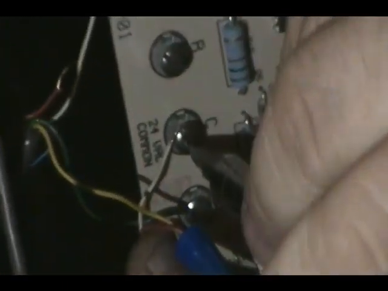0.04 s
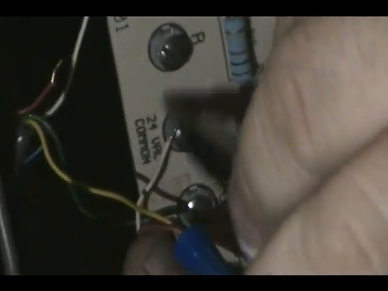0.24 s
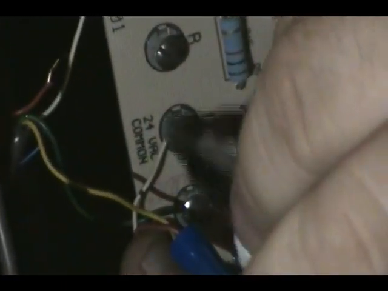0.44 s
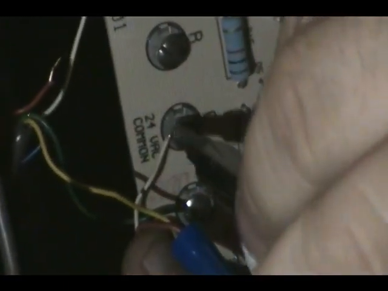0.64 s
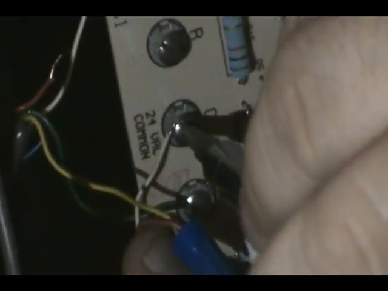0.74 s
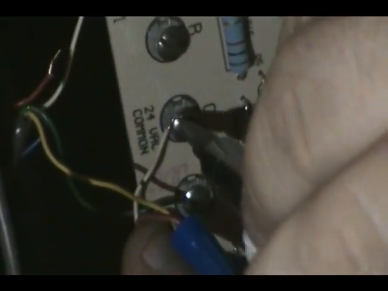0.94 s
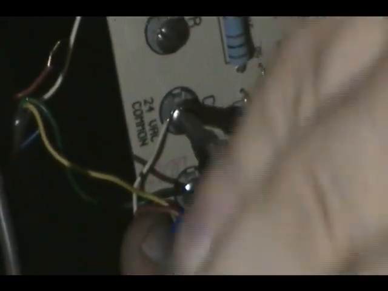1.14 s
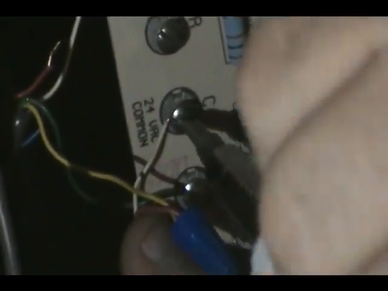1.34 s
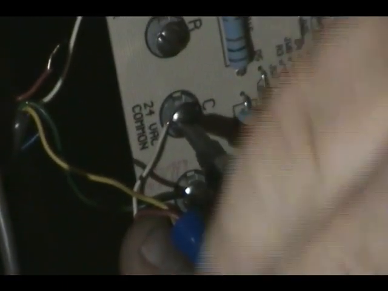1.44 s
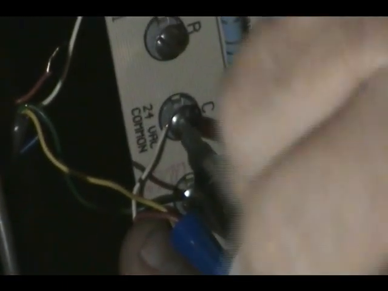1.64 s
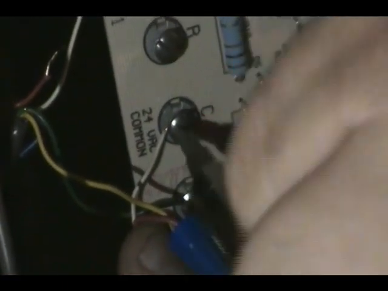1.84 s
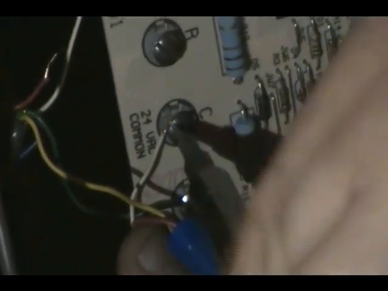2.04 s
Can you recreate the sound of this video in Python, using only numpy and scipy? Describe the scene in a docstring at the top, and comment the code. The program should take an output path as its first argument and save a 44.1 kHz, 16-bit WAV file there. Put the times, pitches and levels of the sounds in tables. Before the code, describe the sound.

A small tool clicks and scrapes lightly on a circuit board's screw terminal, close up.

```python
"""Close up, a small tool works a thin wire onto the screw terminals of a circuit board. The board rings
faintly at the start, and the wire flicks with two dry ticks. Then the tool knocks and scrapes, and each
contact excites the damped modes of board and housing in a small room. Fingers bump the board as they
change grip, and near the end skin brushes softly. A low rumble, hiss, hum and a faint whine lie under
it all."""
import sys
import numpy as np
from scipy import signal
from scipy.fft import rfft, irfft, next_fast_len
from scipy.io import wavfile
from scipy.ndimage import map_coordinates

SR = 44100
rng = np.random.default_rng(int(sys.argv[2]) if len(sys.argv) > 2 else 0)


def wav_record(signal):
    """Record a signal, one row per channel, as 16-bit PCM in the file named by sys.argv[1]."""
    frames = np.transpose(np.atleast_2d(signal))
    bounded = np.clip(frames, -1, 1)
    # unit amplitude maps onto the largest positive 16-bit level
    quanta = np.round(bounded * 32767).astype(np.int16)
    wavfile.write(sys.argv[1], SR, quanta)


N = 92610

# spectrum of the board's dense, quickly damped modes (frequency [Hz], relative density [dB])
CLATTER_SPECTRUM = [(100, -10), (350, -7), (530, 5), (750, -3), (1000, -2), (1270, 4), (1650, 6.5),
                    (2100, 1.5), (2900, 2.5), (3700, 0), (5000, -6.5), (7500, -13), (11000, -16),
                    (15000, -27)]
# left-right coherence of scattered contact sound (frequency [Hz], coherence [1])
CONTACT_COHERENCE = [(50, 0.52), (500, 1), (2500, 0.91), (5000, 0.78), (9000, 0.19), (15000, 0.53)]
# left-right coherence of room noise and skin friction (frequency [Hz], coherence [1])
AIR_COHERENCE = [(50, 0.91), (600, 0.9), (2000, 0.16), (5000, 0.22), (14000, 0.037)]
BASS_HZ, MID_HZ, TREBLE_FROM_HZ, TREBLE_HZ, SIZZLE_HZ = 650, 1250, 1700, 6440, 10100


def amp(db):
    """Amplitude ratio: tenfold for every 20 dB."""
    return 10 ** (np.asarray(db) / 20)


def along(points, hz):
    """Interpolation of (frequency [Hz], value) points on a logarithmic frequency axis."""
    freqs, values = np.transpose(points)
    return np.interp(np.log(hz + 1), np.log(freqs + 1), values)


def unit_energy(x):
    """Normalisation to a mean energy of 1 per channel."""
    return x / np.sqrt(np.mean(np.sum(x ** 2, axis=-1)) + 1e-20)


def filtered(x, response):
    """Linear filtering: the spectrum of x times a frequency response."""
    n = x.shape[-1]
    padded = 2 * next_fast_len(n)
    return irfft(rfft(x, padded) * response(np.fft.rfftfreq(padded, 1 / SR)), padded)[..., :n]


def minimum_phase(db):
    """Causal response with these levels, obtained by folding the cepstrum."""
    cepstrum = irfft(np.log(amp(db)))
    half = len(cepstrum) // 2
    cepstrum[1:half] *= 2
    cepstrum[half + 1:] = 0
    return np.exp(rfft(cepstrum))


def noise(n, spectrum, coherence):
    """Coloured stereo noise of rms 1; the ratio of mid to side sets the coherence."""
    def response(hz):
        angle = np.arccos(np.clip(along(coherence, hz), -.999, .999)) / 2
        return amp(along(spectrum, hz)) * [np.cos(angle), np.sin(angle)]
    mid, side = filtered(rng.standard_normal((2, n)), response)
    return unit_energy(np.array([mid + side, mid - side])) * np.sqrt(n)


def decay(t, t60):
    """Exponential damping: 60 dB in t60 seconds."""
    return np.exp(-np.log(1000) * t / t60)


def pan(db):
    """Left and right gains for an interchannel level difference."""
    return amp(np.array([[.5], [-.5]]) * db)


def add(out, time, db, sound):
    """Superposition; db is the level that a sound of unit energy would have if packed into 10 ms."""
    start = round(time * SR)
    out[:, start:start + sound.shape[1]] += amp(db) * np.sqrt(SR / 100) * sound[:, :N - start]


def tool_contacts():
    """Impact and sliding friction: a hard tool drives the board through the terminal."""
    # spectrum of a hard contact (frequency [Hz], gain [dB])
    hard = [(80, -6), (280, -15), (480, -1), (1400, -0.5), (3000, -5), (8000, 3.5), (15000, -12)]
    # impacts (time [s], level before colouring [dB], bass [dB], treble [dB], sizzle [dB],
    # resonances favoured by the spot struck [(frequency [Hz], lift [dB])])
    knocks = [(0.3698, -29.5, -0.5, -2.5, -22, [(525, 7), (2420, 9.5), (3030, 13.5), (3600, 4)]),
              (0.4121, -31.5, -1, -8, -5, [(2570, 14.5), (3300, 8), (3950, 12)]),
              (0.4127, -34, -10, -26, 3, [(1270, 6.5), (1600, 2.5)]), (0.4768, -33.5, -5, -5, 9, [(1840, 1),
              (2230, 11), (3150, 18.5)]), (0.4890, -34.5, -13.5, -9, 9, [(1290, 5.5), (3130, 19.5)]),
              (0.5266, -35, 2.5, 0, 6, [(1850, 7), (3130, 13.5), (5700, 5)]),
              (0.6461, -36.5, 4.5, 8, -1, [(1660, 12), (2600, 10), (2870, 11)]),
              (0.6475, -40, 7, 1.5, 10, [(1660, 8), (2750, 6), (3120, 12)]),
              (0.7875, -38.5, -14, -9, -2, [(1190, 4), (1486, 6.5)]),
              (1.352, -47, 5.5, -3, -15, [(1300, 4.5), (1540, 6)])]
    # slides (peak time [s], rise [s], fall [s], level before colouring [dB], bass [dB], treble [dB],
    # sizzle [dB], favoured resonance [Hz], lift [dB])
    scrapes = [(.267, .012, 0.051, -32, 3.5, 0, -6.5, 2840, 13),
               (.405, 0.023, 0.035, -41.5, 7, 3.5, -17, 3310, 15.5),
               (0.505, 0.025, 0.029, -38, -7, -4, 4, 2153, 17),
               (.714, 0.025, 0.063, -40.5, 4.5, -6.5, -12, 1580, -2),
               (.772, 0.013, 0.013, -51.5, 4.5, -8, -16, 3800, 2.7),
               (.83, 0.036, 0.01, -46, 9, -6, -3, 1166, 12), (.992, .02, 0.023, -51, 8.5, -8, -6, 550, -11)]
    out = np.zeros((2, N))
    for time, db, bass_db, treble_db, sizzle_db, spots in knocks:
        add(out, time, db, board_response(hard, bass_db, treble_db, sizzle_db, spots))
    for time, rise, fall, db, bass_db, treble_db, sizzle_db, spot_hz, spot_db in scrapes:
        response = board_response(hard, bass_db, treble_db, sizzle_db, [(spot_hz, spot_db)])
        add(out, time - rise, db, friction(response, rise, fall))
    return out


def board_response(contact, bass_db, treble_db, sizzle_db, spots):
    """Impulse response as a sum of damped modes, weighted by the kind and the point of contact."""
    # modes of board and housing (frequency [Hz], level [dB], t60 [s])
    modes = [(270, -17, 0.14), (536.7, -1.5, 0.26), (631, -5.5, 0.11), (699, -13.5, 0.36),
             (721.6, -17, 0.27), (866, -10, 0.36), (1192.7, -1, 0.15), (1254, 13, 0.044), (1570, 3, 0.18),
             (1852, -10, 0.26), (2262, -8.5, 0.35), (2604, 6, 0.04), (3058, 5.5, 0.037)]
    # stereo balance of the board (frequency [Hz], left minus right [dB])
    balance = [(500, 1), (1500, 0), (3000, 1), (8000, 1.5), (15000, 1)]
    ring_db, room_db, mode_spread_db = -3, -5, 2.26
    ring_attack_s, clatter_attack_s = 0.00012, 0.00018
    spot_octaves, ripple_db, ripple_spacing_hz = 0.062, 3, 165.4
    bending_delay_s, bending_hz = 0.00304, 1317
    t = np.arange(SR // 2) / SR
    ring = np.zeros(len(t))
    for mode_hz, db, t60 in modes:
        strength = amp(db + mode_spread_db * rng.normal())
        ring += strength * np.sin(2 * np.pi * (mode_hz * t + rng.random())) * decay(t, t60)
    ring = unit_energy(ring * (1 - np.exp(-t / ring_attack_s)))
    onset = 1 - np.exp(-t / clatter_attack_s)
    clatter = unit_energy(noise(len(t), CLATTER_SPECTRUM, CONTACT_COHERENCE) * onset * decay(t, t60=0.051))
    room = unit_energy(onset * reverberation(len(t)))
    tilt = [(BASS_HZ, bass_db), (MID_HZ, 0), (TREBLE_FROM_HZ, 0),
            (TREBLE_HZ, treble_db), (SIZZLE_HZ, sizzle_db)]
    knots = rng.standard_normal(size=512)

    def colour(hz):
        peaks = sum(lift_db / (1 + (np.log2((hz + 1) / spot_hz) / spot_octaves) ** 2)
                    for spot_hz, lift_db in spots)
        # many small upper resonances ripple the spectrum
        depth = ripple_db * np.minimum(hz / TREBLE_HZ, 1)
        ripple = depth * np.interp(hz / ripple_spacing_hz, np.arange(len(knots)), knots)
        # bending waves are dispersive: the lows arrive after the click
        dispersion = np.exp(-2j * np.pi * bending_delay_s * bending_hz * np.arctan(hz / bending_hz))
        levels = along(contact, hz) + along(tilt, hz) + peaks + ripple
        return minimum_phase(levels) * dispersion * pan(along(balance, hz))
    return filtered(clatter + amp(ring_db) * ring + amp(room_db) * room, colour)


def friction(response, rise, fall, slips_per_s=4500, spread_db=2.5):
    """Stick-slip excitation: random impulses swell by 20 dB over the rise and sink 20 dB per fall."""
    t = np.arange(int((rise + 2 * fall) * SR)) / SR - rise
    slipping = rng.random(SR)[:len(t)] < slips_per_s / SR
    size = amp(spread_db * rng.standard_normal(SR)[:len(t)])
    sign = rng.choice([-1, 1], SR)[:len(t)]
    envelope = 10 ** np.minimum(t / rise, -t / fall)
    slips = slipping * sign * size * envelope
    energy = np.mean(np.sum(response ** 2, axis=1))
    return unit_energy(signal.fftconvolve(response, slips[None], axes=1)) * np.sqrt(energy)


def wire_ticks():
    """Free vibration: a flick excites the wire's heavily damped modes; nearby surfaces scatter it."""
    # flicks of the wire (time [s], level [dB], treble [dB])
    ticks = [(0.2336, -34.5, 1), (0.2728, -38.5, -14)]
    # resonances of the wire (frequency [Hz], bandwidth [Hz], level [dB])
    modes = [(1550, 330, -4), (2830, 240, 6.5), (4620, 320, 0), (6680, 370, -4.5), (8300, 720, -11.5),
             (13000, 3600, -22)]
    scatter_db, tail_db = -3, -7
    out = np.zeros((2, N))
    t = np.arange(SR // 10) / SR

    def resonances(hz):
        return sum((-1) ** k * amp(db) * 1j * hz * width / (mode_hz ** 2 - hz ** 2 + 1j * hz * width)
                   for k, (mode_hz, width, db) in enumerate(modes))
    for time, db, treble_db in ticks:
        white = noise(len(t), [(1000, 0)], CONTACT_COHERENCE)
        scatter = unit_energy(white * decay(t, t60=0.0072))
        impulse = (t == 0) + amp(scatter_db) * scatter
        tilt = [(TREBLE_FROM_HZ, 0), (TREBLE_HZ, treble_db), (2 * TREBLE_HZ, 2 * treble_db)]
        flick = unit_energy(filtered(impulse, lambda hz: resonances(hz) * minimum_phase(along(tilt, hz))))
        tail = unit_energy(noise(len(t), CLATTER_SPECTRUM, CONTACT_COHERENCE) * decay(t, t60=0.045))
        add(out, time, db, pan(db=4) * (flick + amp(tail_db) * tail))
    return out


def ring_and_bumps():
    """Low-mode resonance: the board rings faintly at the start; later, fingers bump it."""
    # spectrum of a soft excitation (frequency [Hz], gain [dB])
    soft = [(80, -9), (200, -4.5), (270, 16.5), (340, 5), (560, 3), (900, 2.5), (1230, -5.5), (1650, -9),
            (2800, -10.5), (5000, -16.5), (15000, -9)]
    # a faint 500-700 Hz ring in the first row, then bumps (peak time [s], rise [s],
    # level before colouring [dB], bass [dB], treble [dB], favoured resonance [Hz], lift [dB])
    swells = [(0.031, 0.028, -58.5, 8.5, -5, 608, 4), (0.371, 0.0019, -34.5, -2.5, 10.5, 740, 21.5),
              (.385, 0.00092, -41.5, -3, -15, 711, 21), (0.493, 0.01078, -52.5, 10, -3, 254, 12.5),
              (.842, 0.0044, -44.5, -2.5, -8, 545, 7.5), (.953, 0.0033, -57.5, 4, -11, 563, 14),
              (.978, 0.015, -50, 2.5, -11, 270, 1), (1.048, 0.013, -44, -0.5, -6, 650, 10),
              (1.1544, .001, -49, -1, -13.5, 687, 12), (1.2951, .003, -46.5, -1, 4.5, 2600, 4),
              (1.305, .005, -38.5, -1, 2, 612.4, 17), (1.378, 0.0053, -43, -1.5, 5, 650, 8),
              (1.395, .012, -54.5, 4, 10.5, 470, 10), (1.426, 0.0089, -52, 4, 2, 402, 14.5),
              (1.47, 0.045, -60, 0, -10, 267, 14), (1.545, 0.004, -55.5, 4.5, -17, 1250, 8),
              (1.615, .009, -44, 0, 4.5, 950, 12), (1.644, .004, -56, 2.5, -5, 302, 6),
              (1.876, .02, -49, 3.5, 11.5, 1300, 2), (1.892, 0.0081, -43, -1, 5.5, 275, 8.5),
              (1.929, 0.025, -44.5, 2, -5, 271, 6.5), (2.031, 0.01, -57, 3.5, 4, 1124, 18.5)]
    out = np.zeros((2, N))
    for time, rise, db, bass_db, treble_db, spot_hz, spot_db in swells:
        response = board_response(soft, bass_db, treble_db, treble_db, [(spot_hz, spot_db)])
        fall = 0.0009 + 0.91 * rise  # a slow swell also fades slowly
        add(out, time - rise, db, friction(response, rise, fall))
    return out


def skin_brush():
    """Friction noise: sliding skin gives a soft hiss that swells as the hand shifts."""
    # envelope of the brushing (time [s], level [dB])
    envelope = [(1.679, -103), (1.76, -67.5), (1.901, -63.5), (1.99, -63), (2.04, -61.5), (2.1, -57)]
    # spectrum of skin friction (frequency [Hz], relative density [dB])
    spectrum = [(500, -5), (3050, -14), (3550, 1.5), (3950, -7.5), (4300, -4), (5200, -24), (8500, -18),
                (15000, -15)]
    level_db = np.interp(np.arange(N) / SR, *np.transpose(envelope))
    return amp(level_db) * noise(N, spectrum, AIR_COHERENCE)


def reverberation(n):
    """Diffuse field of the small room: noise in which each band decays at its own rate."""
    # reverberation times (frequency [Hz], t60 [s])
    times = [(200, 1), (600, 0.22), (1500, 0.28), (4000, 0.2), (12000, 0.2)]
    hz, age, bands = signal.stft(noise(n, CLATTER_SPECTRUM, CONTACT_COHERENCE), SR, nperseg=256)
    _, tail = signal.istft(bands * decay(age, along(times, hz)[:, None]), SR, nperseg=256)
    return tail[:, :n]


def background():
    """Stationary room rumble and hiss, with electrical tones under slow random phase modulation."""
    # spectrum of the room noise (frequency [Hz], relative density [dB])
    spectrum = [(20, -18), (40, -8), (72, 6), (100, -6.5), (150, -2.5), (235, -0.5), (330, -7), (520, -0.5),
                (780, -10), (1300, -10), (2000, -15), (5500, -16.5), (8000, -16.5), (15000, -18.5)]
    # mains hum and a faint whine (frequency [Hz], level [dB])
    tones = [(59, -86), (120, -75.5), (7870, -77)]
    air_db, drift_rad, drift_steps_per_s = -58.5, 0.9, 10
    t = np.arange(N) / SR
    hum = np.zeros(N)
    for hz, db in tones:
        drift = drift_rad * map_coordinates(rng.standard_normal(size=32), [t * drift_steps_per_s])
        hum += amp(db) * np.sqrt(2) * np.sin(2 * np.pi * hz * t + drift)
    return pan(db=0.35) * (amp(air_db) * noise(N, spectrum, AIR_COHERENCE) + hum)


def scene():
    """Superposition: the pressures of all sources add at the microphone."""
    return wire_ticks() + tool_contacts() + skin_brush() + ring_and_bumps() + background()


def record(dry, cutoff_hz=15200):
    """Band limiting: an ideal low-pass filter removes everything above the cutoff."""
    return filtered(dry, lambda hz: hz < cutoff_hz)


dry = scene()
out = record(dry)
wav_record(out)
```